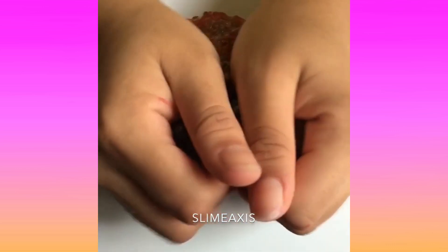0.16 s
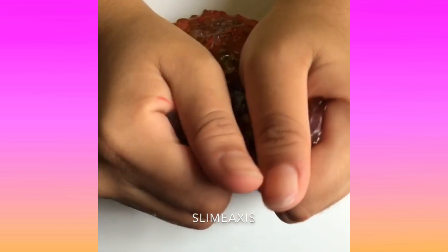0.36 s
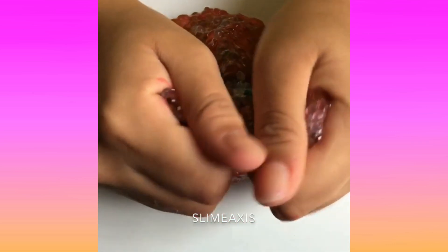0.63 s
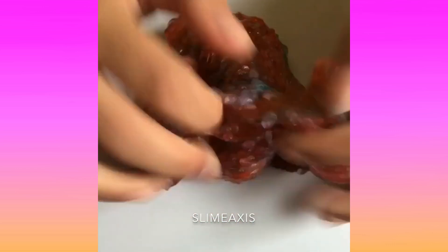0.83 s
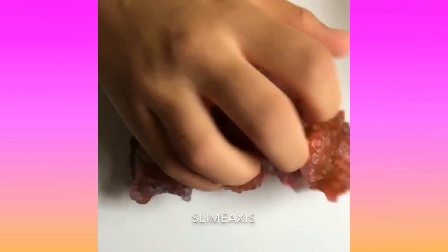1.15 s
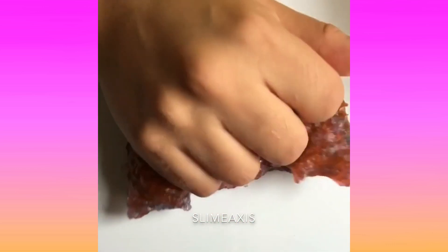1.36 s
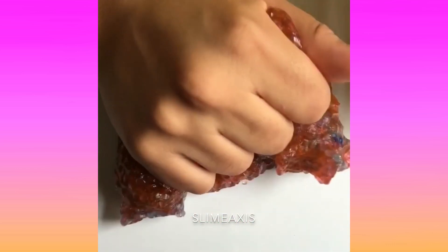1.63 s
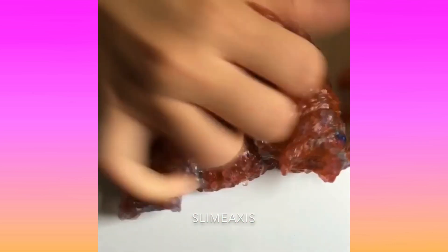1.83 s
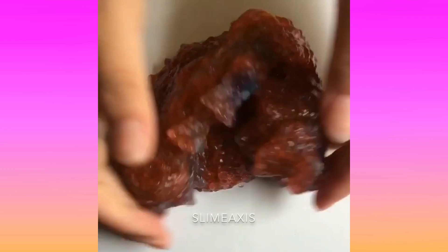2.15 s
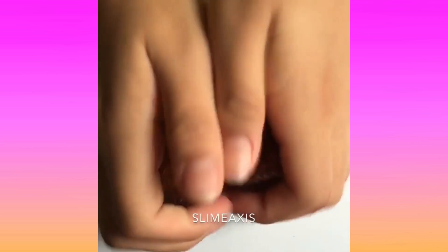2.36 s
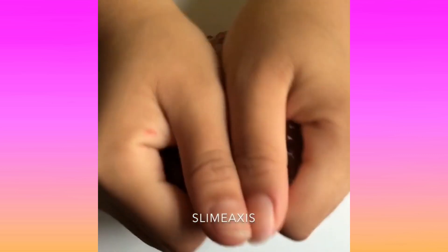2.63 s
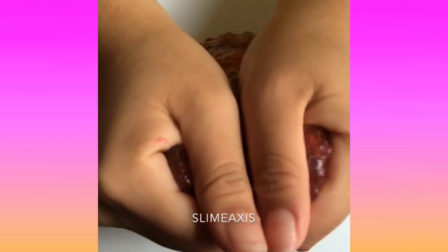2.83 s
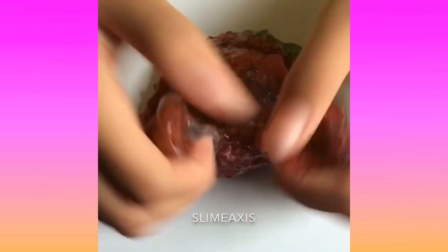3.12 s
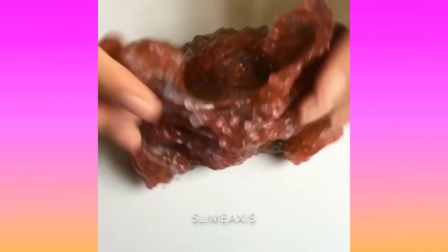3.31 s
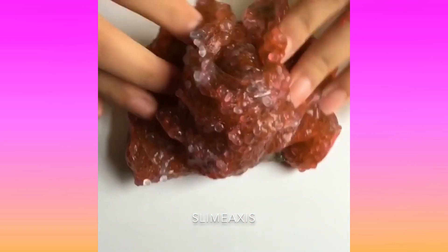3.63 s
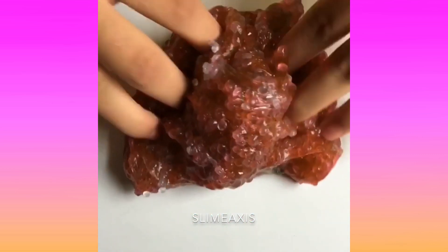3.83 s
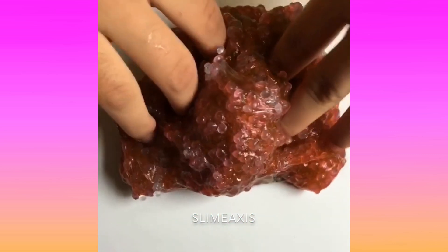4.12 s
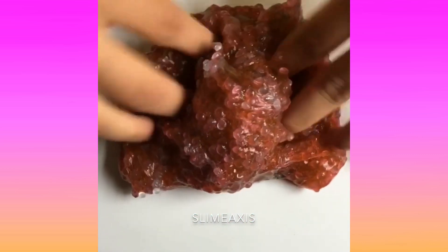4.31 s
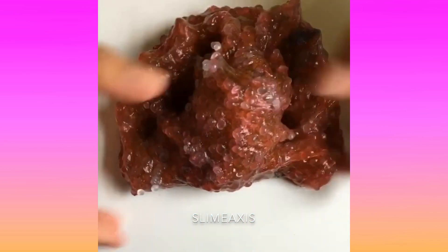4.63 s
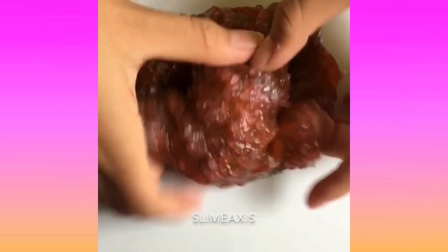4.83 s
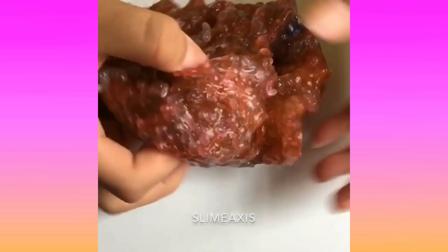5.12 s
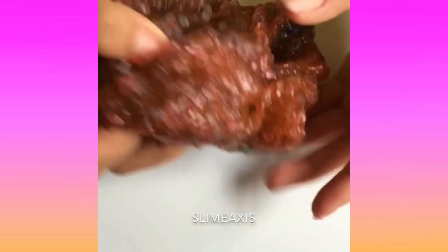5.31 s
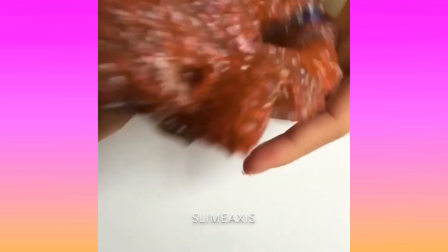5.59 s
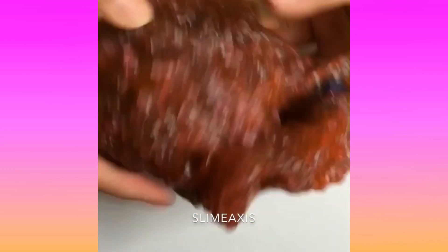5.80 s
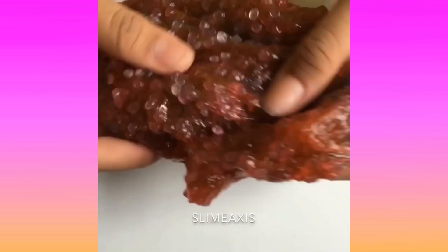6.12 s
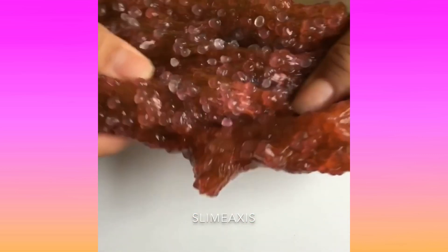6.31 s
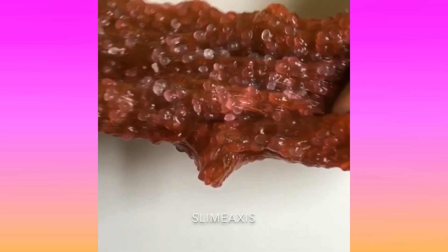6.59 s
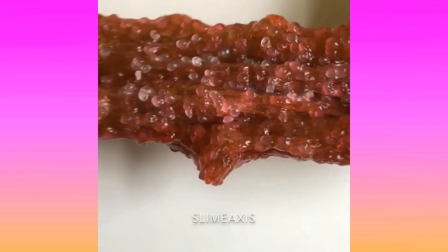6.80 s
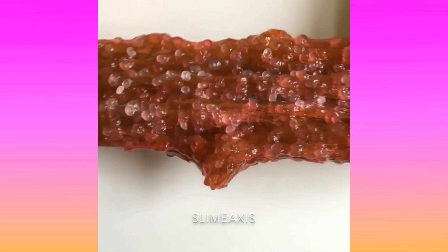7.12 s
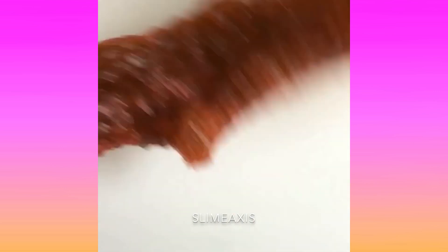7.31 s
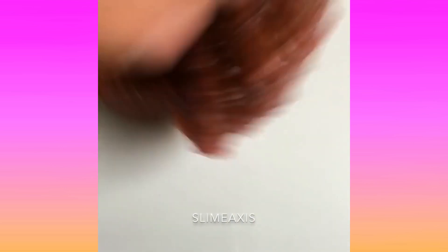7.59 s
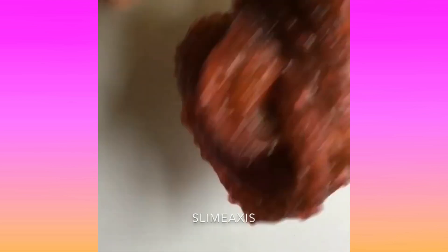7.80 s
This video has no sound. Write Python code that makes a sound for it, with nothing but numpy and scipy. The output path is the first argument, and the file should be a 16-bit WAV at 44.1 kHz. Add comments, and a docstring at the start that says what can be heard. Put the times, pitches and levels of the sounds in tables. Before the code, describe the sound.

A steady low rumble lies under close, dry slime handling in a small room. Hard squeezes give crisp snapping air pops, loud enough to clip at first; letting go makes thick, sticky crackling with low soft bumps. Later come a sudden ripping crackle, several dull thuds on the table and wet peeling, before a long hush of tiny ticks and a slight crackling fold at the end.

```python
"""Two hands work bead-filled slime on a table, close to a small microphone, over a steady low rumble.
First a hard squeeze bursts air pockets in sharp pops, the loudest of them clipped; letting go crackles densely.
The fist presses, the knuckles peel off, and a second hard squeeze pops again. Fingertips sink in and rip free,
the slab peels off the table with soft thuds, then comes a long quiet stretch and a fold. Pops are noise bursts
and dying sines, crackle is random clicks ringing tiny cavities, and a small room adds a short tail."""
import sys
import numpy as np
from scipy import signal
from scipy.fft import rfft, irfft
from scipy.io import wavfile
from scipy.ndimage import uniform_filter1d

SR = 44100
rng = np.random.default_rng(int(sys.argv[2]) if len(sys.argv) > 2 else 0)


def unload_audio(sound):
    """Save the sound as a 16-bit wav file, at the path given as the first command line argument."""
    columns = np.transpose(np.atleast_2d(sound))
    # keep every value between -1 and 1, then stretch to whole-number steps
    steps = np.round(np.clip(columns, -1, 1) * 32767)
    wavfile.write(sys.argv[1], SR, steps.astype(np.int16))


N = 350595   # length in samples


def from_db(db):
    """Turn decibels into a gain."""
    return 10 ** (np.asarray(db) / 20)


def rms_one(x):
    """Scale a sound to an rms (average strength) of 1."""
    return x / np.sqrt(np.mean(x ** 2) + 1e-20)


def at_hz(points, hz):
    """Read a value between listed points, with frequency on a log scale."""
    point_hz, value = np.transpose(points)
    return np.interp(np.log(np.maximum(hz, 1)), np.log(point_hz), value)


def add(track, s, sound):
    """Mix a sound into a track at time s."""
    start = int(np.clip(round(s * SR), 0, N - 1))
    track[start:start + len(sound)] += sound[:N - start]


def coloured(x, colour, size=16384):
    """Give a sound the listed spectrum, with a minimum-phase filter of unit power gain."""
    gain = from_db(at_hz(colour, np.fft.rfftfreq(size, 1 / SR)))
    # folding the cepstrum makes the filter answer as early as it can
    cepstrum = irfft(np.log(gain))
    cepstrum[1:size // 2] *= 2
    cepstrum[size // 2 + 1:] = 0
    response = irfft(np.exp(rfft(cepstrum)))
    return signal.fftconvolve(x, response / np.linalg.norm(response))[:N]


def resonant(x, hz, q):
    """Bring out one frequency, as a hollow does: gain 1 at the peak, narrower with higher q."""
    peak = signal.iirpeak(min(hz, .45 * SR), max(q, .8), fs=SR)
    return signal.lfilter(*peak, x)


def ring(clicks, hz, t60):
    """Each click starts a sine that dies by 60 dB in t60 seconds; a unit click gives unit energy."""
    decay = from_db(-60 / (t60 * SR))
    turn = 2 * np.pi * min(hz, SR / 2 - 1) / SR
    start = [0, np.sin(turn) * np.sqrt(2 * (1 - decay * decay))]
    return signal.lfilter(start, [1, -2 * decay * np.cos(turn), decay * decay], clicks + 1e-18)


def cavities(clicks, low_hz, high_hz, cycles, count=20):
    """Each click rings one of many tiny cavities, which dies by 60 dB within the given cycles."""
    dealt = rng.integers(0, count, N)
    total = 0
    # even steps in Hz make small, high cavities the more common
    for k, hz in enumerate(np.linspace(low_hz, high_hz, count)):
        total = total + ring(clicks * (dealt == k), hz, cycles / hz)
    return total


def ruptures(per_s, spread_db):
    """Clicks at random moments, many small and a few large, bunched by stick and slip."""
    chance = rng.random(N)
    size = np.minimum(rng.exponential(1, N), 4)
    sign = rng.choice([-1, 1], N)
    slow = signal.butter(2, 45, fs=SR, output="sos")
    slip = rms_one(signal.sosfilt(slow, rng.standard_normal(N)))
    breaks = chance < per_s * from_db(4.5 * slip) / SR
    return breaks * sign * from_db(spread_db * size)


def evened(x, window_s):
    """Hold the running rms close to 1, keeping the single grains."""
    size = max(int(window_s * SR), 2)
    power = uniform_filter1d(uniform_filter1d(x * x, size), size)
    return x / np.sqrt(np.maximum(power, 0) + 1e-3 * np.mean(x * x))


# shape of the low rumble's spectrum: pitch_hz, relative level_db
RUMBLE_SHAPE = [(10, -40.5), (20, -23), (29, -9), (36, -12.5), (46, 1), (52, -11), (61, -0.5), (75, -10),
                (130, -21), (300, -26), (450, -32), (1200, -40), (14000, -46)]
RUMBLE_DB = -47.5   # rms


def rumble():
    """Steady random noise, shaped so that nearly all of it lies in the bass."""
    return from_db(RUMBLE_DB) * rms_one(coloured(rng.standard_normal(N), RUMBLE_SHAPE))


# how the room fades and how strong its tail is: pitch_hz, time to die by 60 dB t60_s, relative tail level_db
ROOM_TAIL = [(150, 0.47, -10), (500, 0.0647, -20.5), (1953, 0.22, -14.5), (6120, 0.14, -13),
             (13000, 0.22, -17.5)]


def room(x, size=16384, count=9):
    """The walls add a short diffuse tail: noise that dies at its own rate in each band."""
    t, edges = np.arange(size) / SR, np.geomspace(60, 18000, count + 1)
    point_hz, t60s, levels = np.transpose(ROOM_TAIL)
    response = 0
    for low, high in zip(edges, edges[1:]):
        hz = np.sqrt(low * high)
        fading = from_db(-60 * t / at_hz(np.c_[point_hz, t60s], hz))
        tail = rng.standard_normal(size) * (t > .004) * fading
        band = signal.butter(2, [low, high], "band", fs=SR, output="sos")
        level = from_db(at_hz(np.c_[point_hz, levels], hz))
        response = response + level * signal.sosfilt(band, tail / np.linalg.norm(tail))
    return signal.fftconvolve(x, response)[:N]


# skin sliding over slime and table: middle_s, length_s, level_db (rms before the fade in and out), pitch_hz
SKIN_SLIDES = [(1.143, .28, -50, 1960), (2.213, 0.082, -41, 1360), (3.71, 0.14, -48.5, 590),
               (4.394, 0.11, -33.5, 1010), (5.061, 0.34, -52, 1040), (7.408, 0.099, -48, 1700),
               (7.685, 0.14, -49, 1560), (7.903, 0.17, -46.5, 1870)]


def slides():
    """Sliding skin gives a soft swish of noise, tuned by the hollow of the hand."""
    out = np.zeros(N)
    for middle_s, length_s, db, hz in SKIN_SLIDES:
        size = max(int(length_s * SR), 16)
        friction = rng.standard_normal(N)[:size]
        hollow = resonant(resonant(friction, hz, q=2.4), hz, q=2.4)
        add(out, middle_s - length_s / 2, from_db(db) * np.hanning(size) * rms_one(hollow))
    return out


def table(x):
    """The table top hums briefly in its lowest mode under whatever presses on it."""
    mode = resonant(x, hz=139, q=7)
    return 0.83 * x + from_db(-6.5) * mode


# shape of the bumping's spectrum: pitch_hz, relative level_db
KNEAD_SHAPE = [(25, -33), (50, 5), (90, -11.5), (140, 1.5), (210, -5), (320, 1), (450, -8.5), (800, -22),
               (3000, -50)]


def kneading(bumping):
    """Soft little bumps of the mass and the knuckles against the table, as muffled random clicks."""
    bumps = coloured(ruptures(per_s=350, spread_db=3.5), KNEAD_SHAPE)
    return bumping * from_db(-1.0) * evened(bumps, window_s=0.088)


# slime and fingers landing on the table: start_s, level_db (swell peak before the table answers), pitch_hz
LANDINGS = [(.728, -20, 212), (1.735, -20, 200), (2.095, -17, 340), (2.205, -21.5, 256.6),
            (2.296, -23, 298), (3.164, -13.5, 188), (3.401, -35, 393), (4.209, -29.5, 291),
            (4.388, -25.5, 172), (4.409, -17, 129), (4.66, -14, 167), (4.667, -13.5, 325),
            (4.812, -15, 153.7), (4.942, -19.5, 340), (5.225, -12, 252), (5.338, -23, 382),
            (5.872, -16, 181), (6.297, -35, 513), (7.682, -37.5, 500)]


def thuds(size=4096):
    """A soft landing is a low sine that swells over about a cycle and is damped at once by the slime."""
    t, out = np.arange(size) / SR, np.zeros(N)
    for s, db, hz in LANDINGS:
        age = t / (0.0023 + 0.07 / hz)
        swell = age ** 2 * np.exp(2 * (1 - age))
        add(out, s - .001, from_db(db) * swell * np.sin(2 * np.pi * hz * t))
    return out


# Movements of the hands, in order: close; first hard squeeze; the pressure eases; let go; turn over;
# the fist presses down; eases; the knuckles peel off; a touch; gather the lump; second hard squeeze; let go;
# lift the edges; fingertips sink in; push deeper; start to lift; rip free; grab; reach under;
# peel the slab off the table; a new grip; a tug; the far edge comes off; fingers shift; take both ends;
# the long stretch; the grip loosens; fold over; press the ends together.
# Slow pressure tears sparsely, fingers pulling free tear densely. Levels are relative, before later trims:
# start_s, length_s, squelch_db, crackle_db, bumping_db, swell_db from start to end, nominal ruptures_per_s
HAND_MOVES = [(-.02, 0.18, -36.5, -35.5, -36.5, 8.5, 450), (0.161, .37, -39, -30.5, -50, -2, 320),
              (.55, .14, -54, -48, -54, -2.5, 420), (0.697, 0.2, -33.5, -31.5, -36.5, -10.5, 3600),
              (1.063, .2, -50, -46, -54, 9.5, 1300), (1.264, 0.36, -40, -38, -39.5, 1, 580),
              (1.659, 0.29, -51, -54, -48.5, -2, 1800), (1.783, 0.15, -35.5, -34, -36.5, 8, 4000),
              (2.074, 0.079, -44, -45, -39.5, -19.5, 330), (2.17, .22, -39.5, -39, -39, 5.5, 1000),
              (2.47, 0.56, -42, -41.5, -55, -7, 270), (3.048, 0.18, -36, -35.5, -36.5, -7, 4000),
              (3.22, 0.21, -51.5, -50, -54, -7, 1900), (3.503, 0.46, -53.5, -51, -52, 6, 99),
              (3.967, .18, -54.5, -63, -49.5, 1.5, 275), (4.329, 0.058, -63, -45, -54, 8, 1200),
              (4.362, 0.13, -36.5, -35.5, -26.5, -15.5, 4600),
              (4.641, 0.027, -34.5, -56.5, -21.5, -8, 3500), (4.72, 0.068, -43.5, -45, -50, -5.5, 2500),
              (4.782, .35, -37.5, -39, -34.5, -8, 1800), (5.14, 0.16, -49.5, -53.5, -39.5, -5, 510),
              (5.313, 0.048, -41, -44, -40, -8, 600), (5.372, 0.16, -40, -42.5, -31, 3, 1100),
              (5.63, 0.062, -43, -43.5, -51, -5.5, 1500), (5.77, 0.16, -44.5, -43, -45.5, -7, 1500),
              (6.118, 1.13, -53.5, -55, -61, -3.5, 220), (7.318, .11, -49.5, -47, -58, 6.5, 2000),
              (7.478, 0.28, -52.5, -49.5, -58.5, 3.5, 1230), (7.77, 0.19, -49.5, -44.5, -61, 20, 2000)]
# the slime's quiet settling, always underneath: squelch_db, crackle_db, bumping_db; and its ruptures per s
REST_DB, REST_PER_S = (-62, -63, -62.5), 600
ATTACK_S, ATTACK_PER_LENGTH = 0.0036, 0.046   # a long movement takes hold more slowly
GRIP_S = .022   # from the first touch to the full grip
RELEASE_S, RELEASE_PER_LENGTH = .014, 0.024   # and the slime relaxes longer after it


def handwork():
    """Movements take hold, swell or fade, and relax: gives squelch, crackle, bumping gains and ruptures per s."""
    t = np.arange(N) / SR
    power = from_db(REST_DB)[:, None] ** 2 * np.ones(N)
    tearing = REST_PER_S * power[1]
    for s, length_s, squelch_db, crackle_db, bump_db, swell_db, per_s in HAND_MOVES:
        span = slice(*np.searchsorted(t, [s - .5, s + length_s + .5]))
        age = t[span] - s
        attack_s = ATTACK_S + ATTACK_PER_LENGTH * length_s
        attack = 1 / (1 + (np.maximum(GRIP_S - age, 0) / attack_s) ** 2)
        held = from_db(swell_db * (np.clip(age / length_s, 0, 1) - .5))
        release_s = RELEASE_S + RELEASE_PER_LENGTH * length_s
        release = np.exp(-np.maximum(age - length_s, 0) / release_s)
        levels = from_db([squelch_db, crackle_db, bump_db])[:, None]
        move = (levels * attack * held * release) ** 2
        power[:, span] += move
        tearing[span] += per_s * move[1]
    # where movements overlap, the one that crackles more has more say in the rate
    return *np.sqrt(power), tearing / power[1]


JUDDER_DB, JUDDER_HZ = 2.2, 29.7   # rms depth, and where faster wandering fades out


def judder():
    """The slime sticks and slips under the fingers: a slow random gain around 1."""
    slow = signal.butter(2, JUDDER_HZ, fs=SR, output="sos")
    wander = signal.sosfilt(slow, rng.standard_normal(N))
    return from_db(JUDDER_DB * rms_one(wander))


# shapes of the wet squelch and of the fine crackle, each: pitch_hz, relative level_db
SQUELCH_SHAPE = [(200, -13), (400, -3), (620, -0.5), (850, 2.5), (1200, 3), (1600, 3.5), (2200, 6.5),
                 (2900, 0), (4500, -4), (14000, -41)]
CRACKLE_SHAPE = [(500, -38.5), (2000, 2), (3200, -1), (4400, 2.5), (5000, 0), (6000, 0.5), (7500, -3.5),
                 (9500, -1), (11500, -0.5), (14000, -1.5)]


def peeling(squelch, crackle, per_s):
    """Sticky threads and tiny bubbles break; each gives a tick and a wet blip."""
    clicks = ruptures(per_s, spread_db=3.0)
    rustle = from_db(-15.5) * rng.standard_normal(N)   # countless threads too fine to hear one by one
    blips = cavities(clicks, low_hz=480, high_hz=2800, cycles=10)
    ticks = cavities(clicks, low_hz=3100, high_hz=13500, cycles=24)
    wet = coloured(blips + 2.73 * clicks + 1.7 * rustle, SQUELCH_SHAPE)
    fine = coloured(ticks + clicks + rustle, CRACKLE_SHAPE)
    wet_part = squelch * evened(wet, window_s=0.076)
    fine_part = crackle * from_db(-0.27) * evened(fine, window_s=0.084)
    return wet_part + fine_part


SMALL_POPS_PER_S, SMALL_POP_HZ = 14, (800, 13900)   # average rate and range of pitch
SMALL_POP_DB, SMALL_POP_SPREAD_DB = 2.5, 2.5   # over the crackle at the resting rate of tearing; spread
SMALL_POP_SHARE = 0.44   # part of the energy that rings


def small_pops(crackle, per_s, count=400):
    """Lesser pockets burst at random, as strong as the work on the slime; slow tearing lets them grow larger."""
    when, pitch, chance = rng.random((count, 3)).T
    at = (when * N).astype(int)
    work = crackle[at] * np.sqrt(REST_PER_S / per_s[at])
    db = 20 * np.log10(work) + SMALL_POP_DB + SMALL_POP_SPREAD_DB * rng.standard_normal(count)
    low_hz, high_hz = SMALL_POP_HZ
    hz = low_hz * (high_hz / low_hz) ** np.sqrt(pitch)
    bursts = chance < SMALL_POPS_PER_S * N / SR / count
    return np.c_[at / SR, db, hz, np.full(count, SMALL_POP_SHARE)][bursts]


POP_T60_MS, POP_HZ, POP_DB = 9.9, 6000, -24.5   # dying time, pitch and level of a middling pocket
RING_PITCH_POWER, RING_LEVEL_POWER = .15, .15   # deeper and louder pockets last longer


def ring_time_ms(db, hz):
    """How long an opened pocket takes to die by 60 dB, from its strength and pitch."""
    return POP_T60_MS * (POP_HZ / hz) ** RING_PITCH_POWER * from_db(db - POP_DB) ** RING_LEVEL_POWER


# the larger air pockets bursting: start_s, level_db (over the first 3 ms, before the trims of ring and snap),
# pitch_hz of the cavity, ringing share of the energy (0 to 1, held to .9 at most)
LARGE_POPS = [(0.071, -19.5, 5950, 0.1), (0.0753, -21, 2340, 0.07), (0.1378, -19.5, 5430, 0),
              (0.1824, -16, 11700, 0.02), (.1953, -24, 6170, 1), (0.2118, -16.5, 5800, 0.16),
              (.219, -17.5, 10400, 0.4), (0.2318, -21, 7000, 0), (0.2584, -10, 6430, 0.47),
              (.2661, -17.5, 7200, 0.65), (.2844, -21, 3020, 0.7), (0.2959, -14.5, 5040, 0.01),
              (0.3008, -16.5, 4570, 0.5), (0.313, -21.5, 11640, 0.5), (.36, -4.5, 6210, 0.5),
              (0.3846, -15, 11200, 0.12), (.392, -8.5, 6980, 0.2), (.4008, -14, 9600, 0),
              (0.4037, -27.5, 1900, 0.4), (0.427, -18.5, 4330, 0.01), (0.4426, -29, 1370, 0.6),
              (.4496, -12.5, 11240, 0.27), (0.4616, -13.5, 13090, 0.3), (0.4754, -12.5, 9230, 0.3),
              (0.505, -15.5, 7120, .2), (0.5354, -24, 11200, 0.2), (.556, -24.5, 6900, .1),
              (0.5789, -21, 4340, 0), (0.7864, -24.5, 11600, 0.4), (1.257, -22, 11800, 0.03),
              (1.2955, -24.5, 11200, 0.22), (1.343, -27, 2260, 0.03), (1.4173, -17, 12700, 0.1),
              (1.45, -18, 11600, 0.08), (1.4909, -26, 11700, .2), (1.529, -11.5, 13000, 0.2),
              (1.547, -11, 11900, 0.3), (1.5659, -17.5, 12000, 0), (1.6649, -29, 11630, 0.13),
              (2.0862, -39.5, 4500, .4), (2.1068, -39.5, 4330, 0.38), (2.2327, -35.5, 1420, 0.94),
              (2.3479, -29, 3970, 0.12), (2.4018, -30, 3360, 0.17), (2.51, -22.5, 11800, 0.25),
              (2.537, -22.5, 2110, 0.54), (2.5552, -12.5, 2210, 1), (2.5682, -19, 5870, 0.77),
              (2.569, -34, 2180, .4), (2.602, -9.5, 2280, 0.67), (2.6549, -20.5, 10600, 0.17),
              (2.6994, -12.5, 2580, 0.65), (2.73, -23, 13200, 0.05), (2.7542, -22, 5730, 0.07),
              (2.7875, -18, 12900, 0.1), (2.8094, -21, 7200, 0.2), (2.859, -14.5, 7670, 0.09),
              (2.8725, -23.5, 4300, .1), (2.8898, -18, 7670, 0), (2.8936, -16, 8300, 0.1),
              (2.9157, -16, 8700, 0), (2.95, -7, 6140, 0.07), (3.0681, -28.5, 800, 0.34),
              (3.1578, -28.5, 1170, 1), (3.2226, -31, 11950, .2), (3.3513, -38, 1160, 0.87),
              (3.431, -34, 11800, 0.5), (3.683, -35.5, 9700, .3), (3.7776, -37, 9300, 0.54),
              (3.8175, -36.5, 1440, 0.12), (3.8868, -44, 6420, .1), (3.899, -37.5, 5830, 0),
              (4.2109, -42.5, 1096, 0.7), (4.3213, -41, 10400, .9), (4.3642, -25, 9600, 0.06),
              (4.6523, -32, 710, 1), (4.657, -34, 1980, 0.83), (4.6677, -27.5, 1310, 1),
              (4.8104, -22.5, 1280, 1), (4.942, -22, 1250, 0.3), (5.1493, -35, 12400, 0.2),
              (5.2752, -36.5, 1620, 0.23), (5.3207, -35.5, 2950, 0.17), (5.3377, -27, 7840, 0.32),
              (6.0989, -24, 11100, 0.07), (6.255, -46.5, 1500, 0), (6.304, -38, 11050, 1),
              (6.3446, -42, 9200, 1), (6.62, -33, 11900, 0.14), (6.6207, -41, 1480, 1),
              (6.7637, -35.5, 11330, 0.2), (7.856, -36, 1950, 0.55)]
# shape of the snap's spectrum: pitch_hz, relative level_db
SNAP_SHAPE = [(100, -9.5), (400, 1), (1200, 0), (3000, -4.5), (4400, -1), (6300, -2.5), (8500, -4),
              (11500, -4.5), (14000, -3.5)]


def pops(pockets, size=2048):
    """The film over an air pocket tears with a snap and the opened cavity rings for a few milliseconds."""
    t, rings, snaps = np.arange(size) / SR, np.zeros(N), np.zeros(N)
    first, fading = t < .003, np.exp(-t / .003)
    chance = rng.standard_normal((len(pockets), 2, size))
    neighbours_hz = rng.uniform(4200, 12500, len(pockets))
    for (s, db, hz, share), (tear, scatter), neighbour_hz in zip(pockets, chance, neighbours_hz):
        share = np.clip(share, 0, .9)
        dying = from_db(-60 * t * 1000 / ring_time_ms(db, hz))
        # the hands scatter each pop along paths of its own
        paths = (t == 0) + from_db(-12) * scatter * fading / np.linalg.norm(fading)
        # the power makes the ring die faster than the tear
        tone = signal.fftconvolve(np.sin(2 * np.pi * hz * t) * dying ** 1.44, paths)[:size]
        snap = tear * (dying + .5 * np.exp(-t / 0.00022) + 0.12 * fading)   # the first tear is the sharpest
        snap = snap * (1 - np.exp(-t / .00008))   # the hole takes an instant to open
        # the tear is heard through its cavity and through a gap between the beads beside it
        snap = snap + 1.7 * resonant(snap, hz, q=1.5) + 1.1 * resonant(snap, neighbour_hz, q=5)
        # a small pocket radiates little bass
        snap = signal.lfilter(*signal.butter(1, hz / 12, "high", fs=SR), snap)
        add(rings, s, from_db(db) * np.sqrt(share) * tone / np.std(tone[first]))
        add(snaps, s, from_db(db) * np.sqrt(1 - share) * snap / np.std(snap[first]))
    return from_db(5.5) * rings + from_db(2.0) * coloured(snaps, SNAP_SHAPE)


def scene():
    """The slime in its room, over a steady low rumble."""
    squelch, crackle, bumping, per_s = handwork()
    on_table = table(kneading(bumping) + thuds())
    sticky = judder() * peeling(squelch, crackle, per_s)
    pockets = np.vstack([LARGE_POPS, small_pops(crackle, per_s)])
    slime = pops(pockets) + sticky + slides() + on_table
    return (slime + room(slime) + rumble())[None]


CUTOFF_HZ = 13900   # nearly nothing passes above this


def record(dry):
    """The microphone overloads: peaks beyond .9 are cut flat, then the highest treble is removed."""
    top = signal.ellip(10, .2, 70, CUTOFF_HZ, fs=SR, output="sos")
    return signal.sosfilt(top, np.clip(dry, -.9, .9))


dry = scene()
out = record(dry)
unload_audio(out)
```